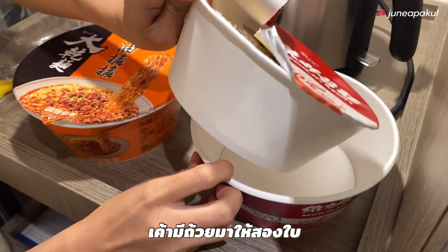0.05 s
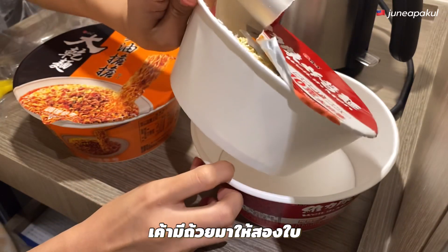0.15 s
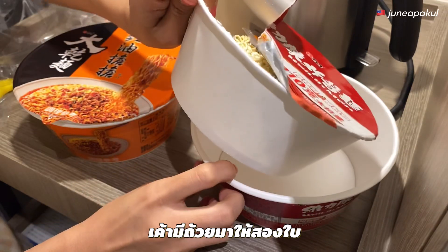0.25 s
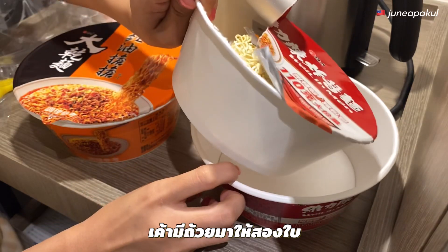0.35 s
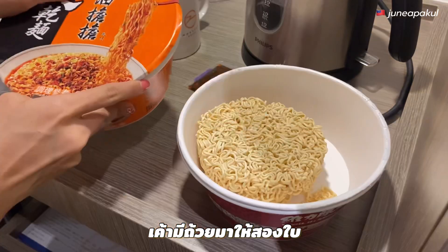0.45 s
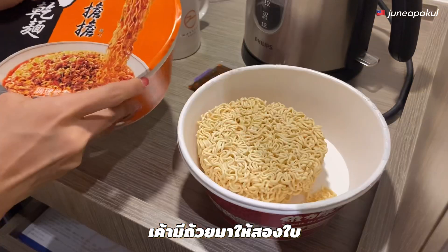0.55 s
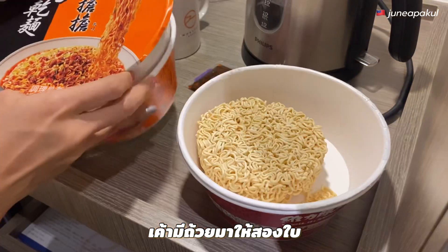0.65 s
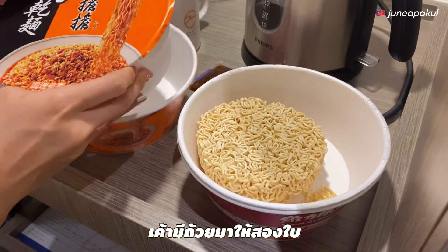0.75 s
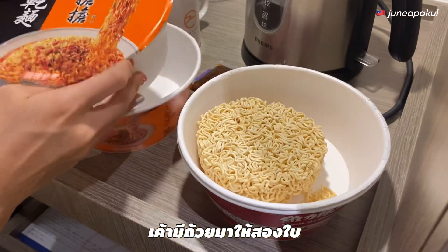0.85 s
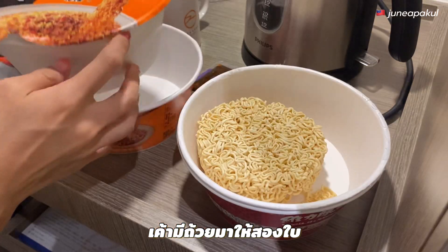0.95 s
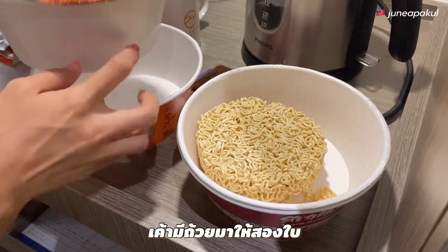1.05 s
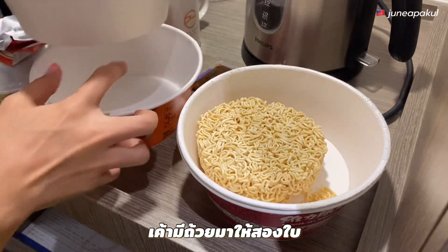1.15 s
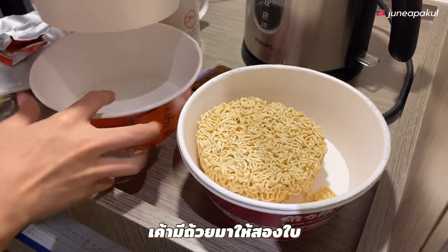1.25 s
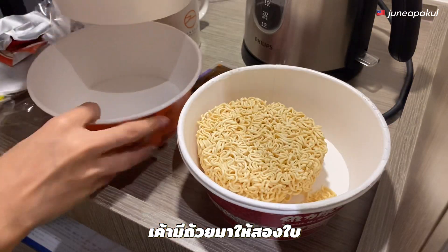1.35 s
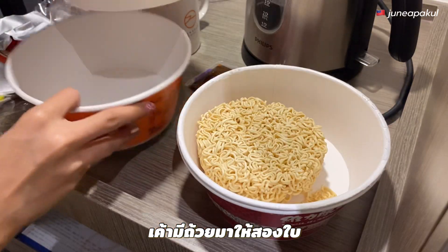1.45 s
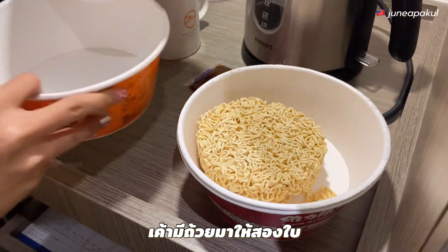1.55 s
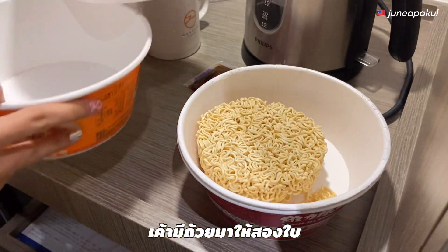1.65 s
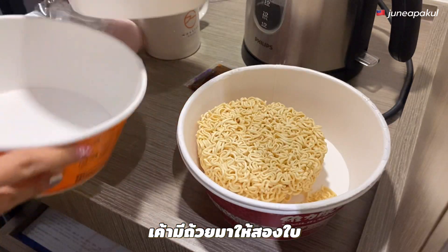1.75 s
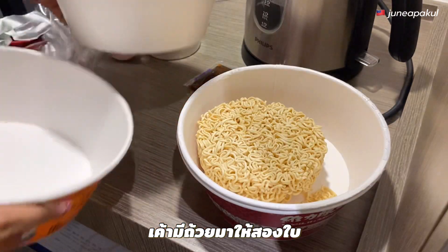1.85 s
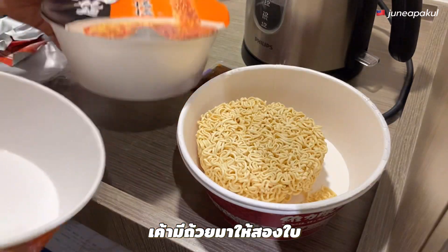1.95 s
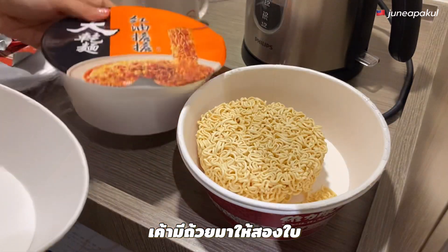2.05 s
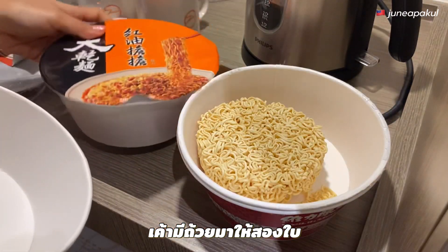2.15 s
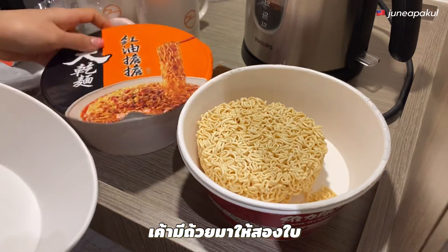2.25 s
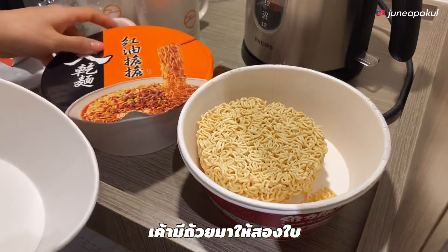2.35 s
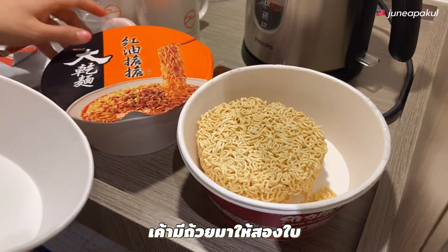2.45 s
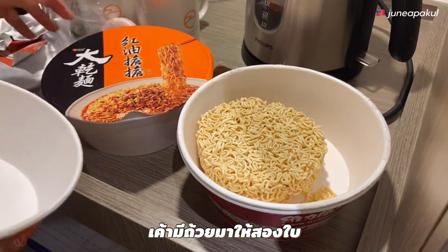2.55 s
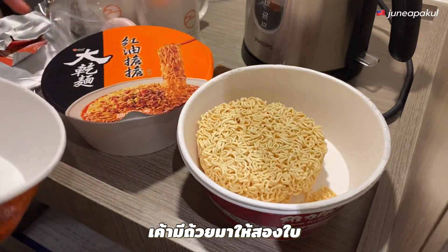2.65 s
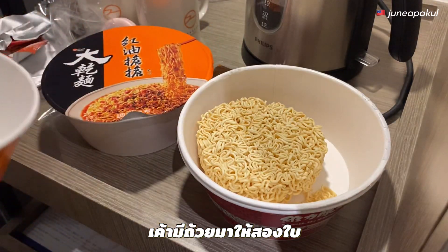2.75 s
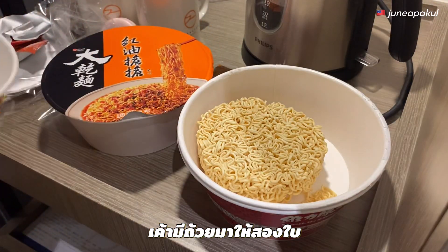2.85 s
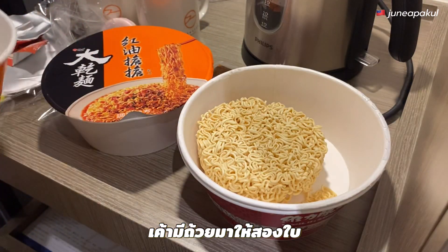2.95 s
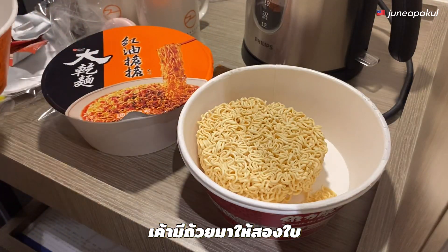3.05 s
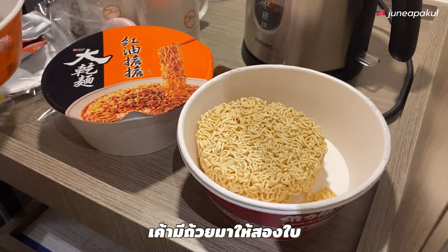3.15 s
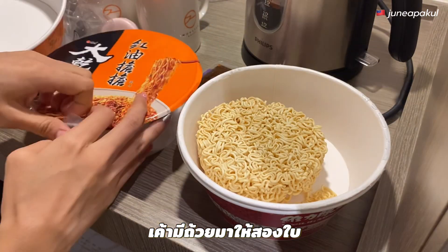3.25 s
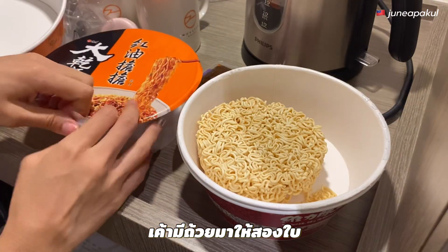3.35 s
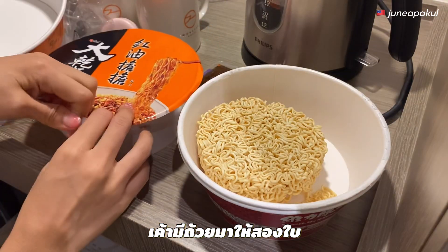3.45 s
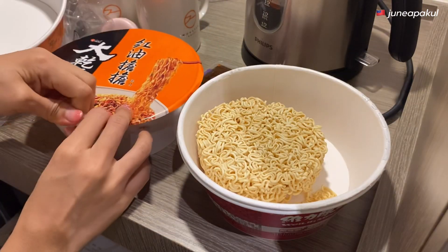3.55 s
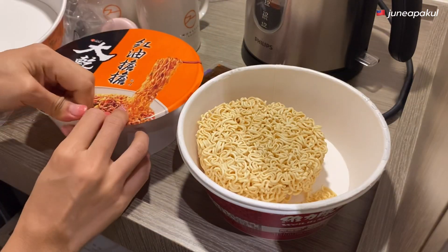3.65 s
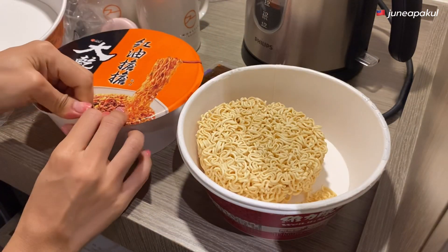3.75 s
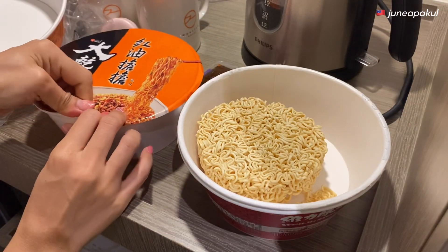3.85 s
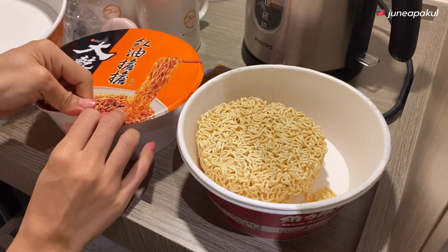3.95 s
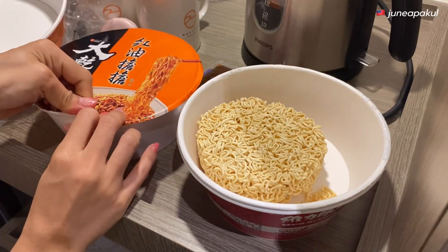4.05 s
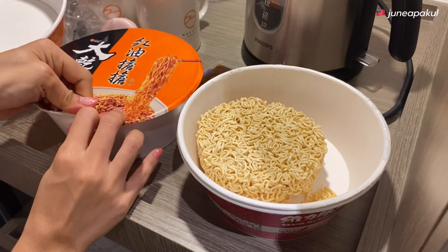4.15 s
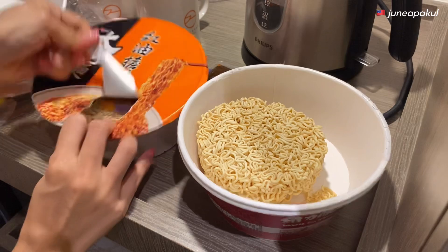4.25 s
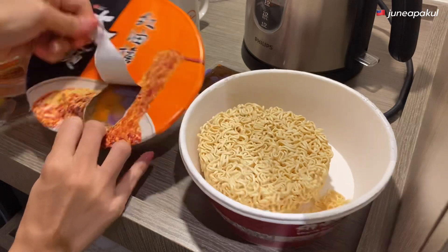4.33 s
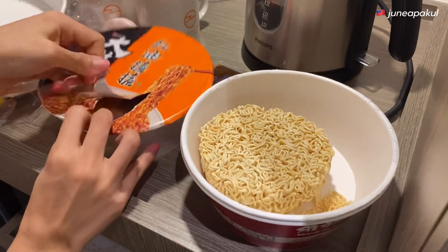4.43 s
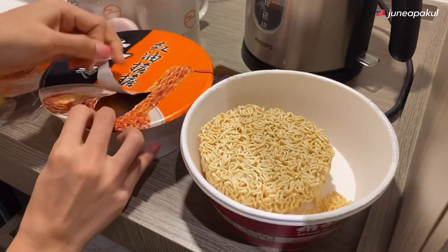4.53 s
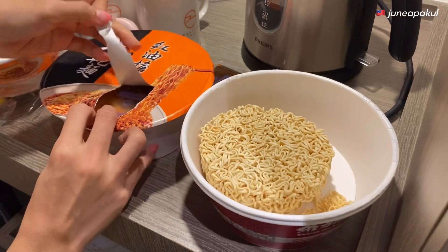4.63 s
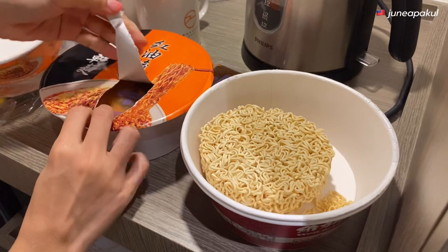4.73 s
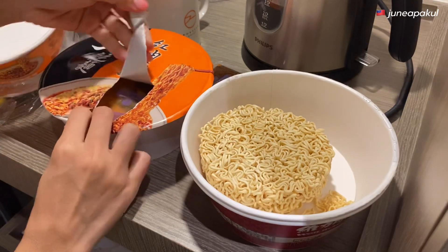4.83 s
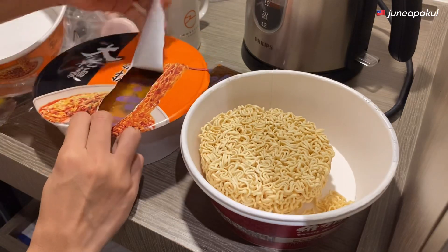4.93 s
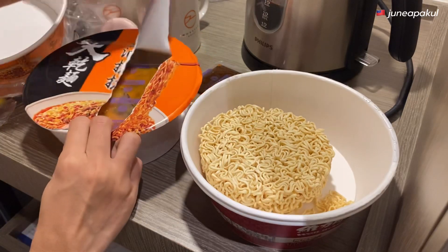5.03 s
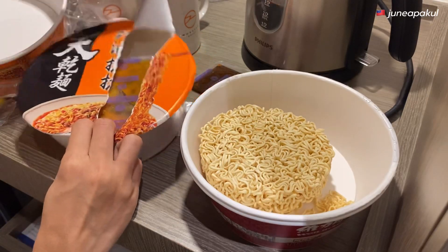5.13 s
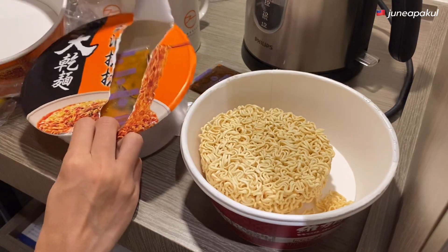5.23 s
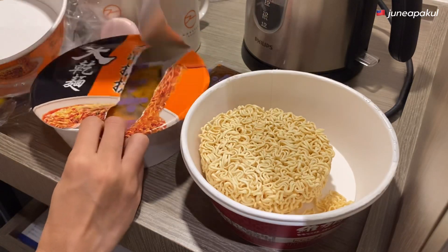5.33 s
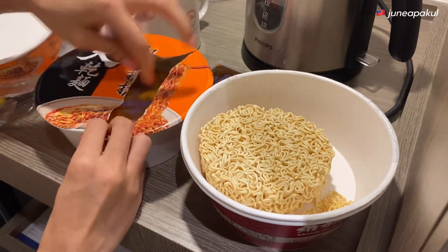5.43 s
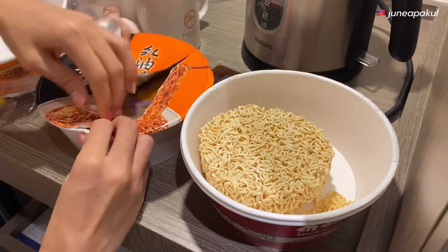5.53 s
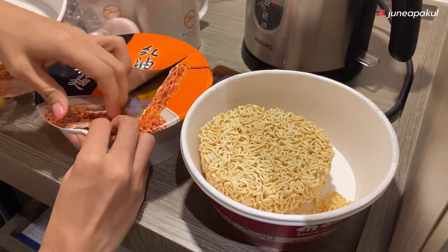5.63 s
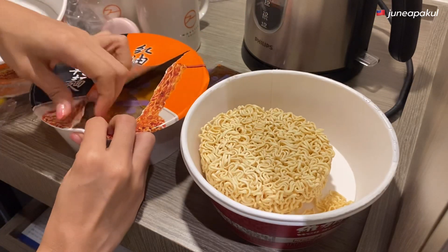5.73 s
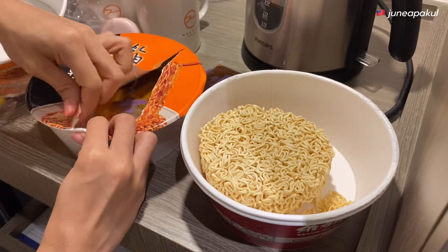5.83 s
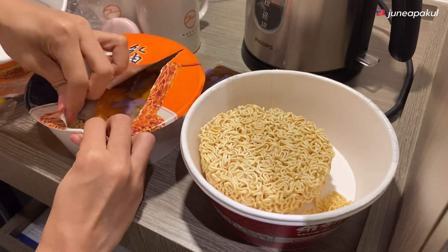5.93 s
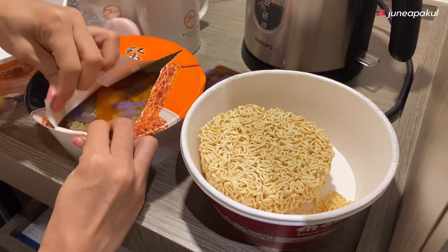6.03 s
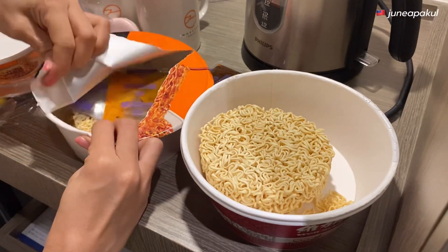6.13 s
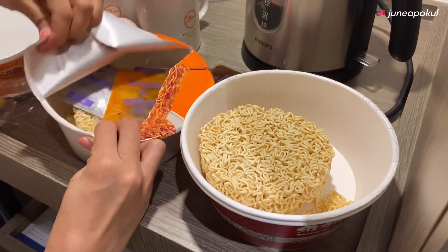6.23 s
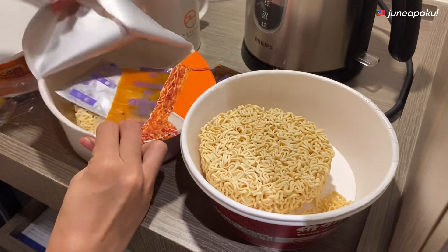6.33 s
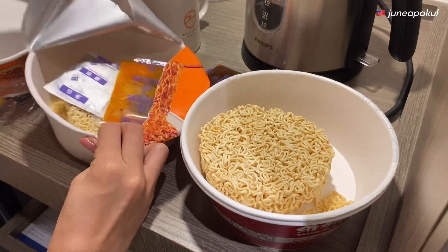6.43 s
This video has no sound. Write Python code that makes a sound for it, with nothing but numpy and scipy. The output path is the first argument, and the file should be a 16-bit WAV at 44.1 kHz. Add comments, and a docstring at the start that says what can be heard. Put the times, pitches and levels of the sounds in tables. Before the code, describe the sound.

Close, dry handling of paper noodle bowls: hollow thumps and scrapes, then fingernails picking and sharp, crackling tears of a foil lid.

```python
"""In a small humming room, hands stack and set down paper bowls on a table, close to a phone with two sound ports.
They also pick at a foil lid and pull it back in jerks.
Blows ring each bowl as a set of fading tones and crack its paper wall as noise and short tones.
Rubbing is a dense rain of tiny grains that shakes the bowl, crinkles the paper and tears the glue.
Paper, foil and nails tick as short noise bursts; the hum is wavering filtered noise."""
import sys
import numpy as np
from scipy import signal
from scipy.fft import rfft, irfft
from scipy.io import wavfile
from scipy.ndimage import uniform_filter1d

SR = 44100
rng = np.random.default_rng(int(sys.argv[2]) if len(sys.argv) > 2 else 0)


def natural_amplitude(level_db):
    """Convert a level in decibels to a linear amplitude factor, elementwise."""
    exponent = np.asarray(level_db, float) / 20
    return 10 ** exponent


def unload_wav(signal):
    """Save mono or channel-first audio to the path in sys.argv[1] as 16-bit WAV at rate SR, clipped to [-1, 1]."""
    wavfile.write(
        sys.argv[1],
        SR,
        np.round(np.clip(np.atleast_2d(signal).T, -1, 1) * 32767).astype(np.int16),
    )


N = 285768  # length of the scene in samples


def shape(table):
    """Gain of every frequency bin, read from (frequency [Hz], gain [dB]) points."""
    hz, db = np.transpose(table)
    bins_hz = np.fft.rfftfreq(N, 1 / SR)
    return natural_amplitude(np.interp(np.log(bins_hz + 1), np.log(hz + 1), db))


def colour(x, table):
    """Filter a sound by such a table."""
    return irfft(rfft(x) * shape(table), N)


def unit(x):
    """Scale to an rms of 1."""
    return x / np.sqrt(np.mean(x ** 2))


def band(x, lo_hz, hi_hz):
    """Keep only the frequencies between two limits."""
    sos = signal.butter(2, [lo_hz, min(hi_hz, .45 * SR)], "bandpass", fs=SR, output="sos")
    return signal.sosfilt(sos, x)


def fade(t60, size):
    """Envelope that loses 60 dB in t60 seconds."""
    return np.exp(-np.log(1000) * np.arange(size) / SR / t60)


def add(out, s, x):
    """Mix x into out from time s."""
    i = int(s * SR)
    out[i:i + len(x)] += x[:N - i]


def walk(rate):
    """Wander in straight lines between random levels, with `rate` new levels a second and rms 1."""
    k = int(SR / rate)
    steps = np.repeat(rng.standard_normal(N // k + 1), k)
    return unit(uniform_filter1d(steps, k)[:N])


def grains(per_s, spread_db):
    """Tiny releases at random moments, most small and a few large."""
    hit, sign, size = rng.random((3, N))
    return unit((hit < per_s / SR) * np.sign(sign - .5) * natural_amplitude(-spread_db * np.log(size + 1e-4)))


# spectrum of the room's hum: (frequency [Hz], level [dB per Hz])
HUM_SPECTRUM = [(21, -84), (36, -7), (90, -15), (128, -3), (161, -11.5), (218, -16.5), (319, -15.5),
                (587, -17), (719, -27.5), (859, -25.5), (1290, -33), (8000, -53), (12000, -52.5),
                (15500, -70)]
HUM_DB = -50.5  # rms of the part that both channels share
# side level against mid level, for hum, near sounds and room: (frequency [Hz], side minus mid [dB])
SIDE_LEVEL = [(60, -12), (330, -11), (600, 1), (1300, 1.5), (3000, -6), (6000, -0.5), (9500, 2),
              (11500, -9.5), (16000, -26)]


def hum():
    """Appliances and air in the room: noise whose bands waver on their own; the two channels share its bass."""
    mid, side = rng.standard_normal((2, N))
    # the low bands and one near 420 Hz flicker faster
    flicker_bands = [(90, 3.5), (125, -5.0), (170, -7), (330, -43), (420, 9.0), (600, -85)]
    flicker = colour(rng.standard_normal(N), flicker_bands) * natural_amplitude(walk(27))
    mid = colour(mid * natural_amplitude(walk(1.66)) + flicker, HUM_SPECTRUM)
    side = colour(colour(side, HUM_SPECTRUM), SIDE_LEVEL)
    return natural_amplitude(HUM_DB) / np.sqrt(np.mean(mid ** 2)) * np.array([mid + side, mid - side])


def room(x):
    """Echoes as a short diffuse tail, duller as it dies; the two channels share its bass and its top."""
    size, t60_s, level_db, dull_hz = 16384, 0.18, -14.5, 6400
    noise = rng.standard_normal((2, size))
    lows = band(noise, 140, dull_hz) * fade(t60_s, size)
    highs = band(noise, dull_hz, 24000) * fade(0.051 * t60_s, size)
    tail = (lows + highs) * np.minimum(np.arange(size) / SR / 0.0055, 1)
    tail = tail / np.sqrt(np.sum(tail ** 2) / 2)
    mid, side = natural_amplitude(level_db) * signal.fftconvolve(x[None], tail, axes=1)[:, :N]
    side = colour(side, SIDE_LEVEL)
    return np.array([mid + side, mid - side])


# lean of near sounds to one port: (frequency [Hz], left minus right [dB])
NEAR_LEAN = [(60, -2), (200, 8), (380, -1.5), (700, 9), (1300, 0.5), (5000, -4), (12000, -1)]


def ports(x):
    """Table, kettle and phone body scatter the near sound differently into the two ports."""
    scatter = rng.standard_normal(2048) * fade(0.011, size=2048)
    scatter = scatter * np.minimum(np.arange(2048) / SR / 0.008, 1)
    scattered = signal.fftconvolve(x, scatter / np.sqrt(np.sum(scatter ** 2)))[:N]
    side = colour(scattered, SIDE_LEVEL)
    lean = np.sqrt(shape(NEAR_LEAN))
    tilt = irfft(rfft(x) * (lean - 1 / lean) / (lean + 1 / lean), N)
    return np.array([x + tilt + side, x - tilt - side])


# a rim scuffs once: (time [s], peak level [dB], starting pitch [Hz], length [s])
SCUFF = [(1.1188, -33, 3450, .013)]


def squeak():
    """A scuffed rim: one short, slightly falling tone with a noisy edge."""
    out = np.zeros(N)
    s, db, hz, length = SCUFF[0]
    t = np.arange(2048) / SR
    tone = np.sin(2 * np.pi * hz * t * (1 - 0.98 * t)) * np.exp(-(t / length) ** 4)
    rasp = unit(band(rng.standard_normal(2048), hz / 1.4, hz * 1.12)) * fade(0.062, size=2048)
    scuff = tone + 0.51 * rasp
    add(out, s, natural_amplitude(db) * scuff / np.abs(scuff).max())
    return out


# short ticks of paper, foil and nails, some on the edge of a blow:
# (time [s], peak level [dB], pitch [Hz])
SHORT_TICKS = [(0.644, -31, 2340), (1.369, -37.5, 2440), (1.694, -39.5, 2670), (2.142, -42, 2060),
               (2.198, -32, 9100), (2.217, -26, 8850), (2.234, -19, 8650), (3.047, -47, 3430),
               (3.354, -37.5, 4300), (3.762, -35, 9500), (3.783, -51, 11500), (3.882, -31, 12000),
               (3.894, -36, 11500), (3.912, -25, 11500), (4.039, -37, 11000), (4.079, -53, 12500),
               (4.1655, -38, 12700), (4.75, -43, 6200), (5.309, -23.5, 3020), (5.656, -38, 2700),
               (5.764, -22, 11000), (5.769, -22, 5150), (5.873, -31.5, 4400)]


def ticks():
    """Short ticks of paper, foil and nails: noise bursts around one pitch, shorter the higher."""
    out = np.zeros(N)
    cycles = 100  # a burst loses 60 dB in this many cycles
    for s, db, hz in SHORT_TICKS:
        burst = band(rng.standard_normal(1024), hz / 1.57, hz * 1.5) * fade(cycles / hz, size=1024)
        add(out, s, burst * natural_amplitude(db) / np.abs(burst).max())
    return out


def move(start, hold, db, change_db, rise_db, fall_db):
    """Power of one hand move: it rises, holds while drifting, and falls; slopes in dB a second."""
    t = np.arange(N) / SR - start
    drift = change_db * np.clip(t / hold, 0, 1)
    slopes = rise_db * np.minimum(t, 0) - fall_db * np.maximum(t - hold, 0)
    return natural_amplitude(db + drift + slopes) ** 2


# hands fidget with the bowls between the moves: (time [s], crinkle level [dB])
FIDGETING = [(0.55, -76), (1.3, -65.5), (2.0, -72.5), (2.5, -71.5), (2.75, -86), (3.15, -75.5), (3.4, -65),
             (4.1, -67), (4.6, -61), (5.6, -64.5), (6.48, -49)]
FIDGET_BOWL_DB, FIDGET_FIZZ_DB = 9, -3  # relative to the crinkle
# paper walls slide on each other: (start [s], hold [s], crinkle level [dB], shaken bowl level [dB])
WALL_SLIDES = [(0.48, 0.021, -54, -49.5), (0.581, 0.092, -49.5, -47), (0.694, 0.01, -41, -25),
               (0.731, 0.041, -44.5, -28), (0.797, 0.096, -51, -32.5), (1.124, 0.0078, -68, -51),
               (1.344, 0.0099, -55, -59), (1.544, 0.027, -42, -42), (2.017, 0.04, -65, -82),
               (2.122, 0.083, -58, -54), (2.222, 0.049, -35, -28.5), (2.416, 0.056, -63, -82),
               (3.047, 0.02, -68, -61), (3.221, 0.049, -51.5, -49.5), (3.333, 0.038, -59.5, -51),
               (3.636, 0.022, -65, -43)]
SLIDE_RISE_DB_PER_S, SLIDE_FALL_DB_PER_S = 906, 181  # of the crinkle
SLIDE_FIZZ_DB = -8  # relative to the crinkle, before pressing dulls it
PRESS_DULLS = 0.29  # dB of fizz lost per dB that the bowl outweighs the crinkle
# pulls on the lid: (start [s], hold [s], crinkle level [dB], change over the hold [dB],
# glue fizz relative to crinkle [dB])
LID_PULLS = [(4.229, 0.038, -28, 1, -2), (4.344, 0.051, -43, 5, -10), (4.427, 0.1, -32.5, -5.5, -6.5),
             (4.865, 0.11, -37, 6.5, -0.5), (5.012, 0.1, -30.5, -5, -1.5), (5.165, 0.092, -40.5, -9, -6),
             (5.31, 0.078, -42.5, 0.5, -1.5), (6.003, 0.19, -43.5, 1, -5), (6.211, 0.22, -42.5, 4, 1)]
PEEL_RISE_DB_PER_S, PEEL_FALL_DB_PER_S = 546, 216  # of the crinkle
PEEL_BOWL_DB = 1.5  # relative to the crinkle
# nails work at the glued edge: (start [s], hold [s], rustle level [dB])
EDGE_PICKS = [(3.729, 0.08, -56), (3.84, 0.089, -51.5), (3.96, 0.026, -58), (4.126, 0.06, -57),
              (4.201, 0.011, -44), (5.467, 0.049, -60), (5.78, 0.012, -64), (5.89, 0.19, -53.5)]
PICK_RISE_DB_PER_S, PICK_FALL_DB_PER_S = 342, 171
BOWL_QUICK, FIZZ_QUICK = 1.37, 1.33  # multiples of the crinkle's rise and fall rates


def hands(t):
    """Gains of bowl, crinkle, fizz and picked foil edge: all moves add in power over the fidgeting."""
    s, db = np.transpose(FIDGETING)
    fidget_db = np.interp(t, s, db, left=-120)
    power = natural_amplitude(fidget_db + np.array([[FIDGET_BOWL_DB], [0], [FIDGET_FIZZ_DB]])) ** 2
    quick = np.array([[BOWL_QUICK], [1], [FIZZ_QUICK]])
    for s, hold, db, bowl_db in WALL_SLIDES:
        fizz_db = db + SLIDE_FIZZ_DB - PRESS_DULLS * (bowl_db - db)
        levels = np.array([[bowl_db], [db], [fizz_db]])
        power = power + move(s, hold, levels, 0, quick * SLIDE_RISE_DB_PER_S, quick * SLIDE_FALL_DB_PER_S)
    for s, hold, db, change_db, fizz_db in LID_PULLS:
        levels = db + np.array([[PEEL_BOWL_DB], [0], [fizz_db]])
        power = power + move(s, hold, levels, change_db,
                             quick * PEEL_RISE_DB_PER_S, quick * PEEL_FALL_DB_PER_S)
    picking = sum(move(s, hold, db, 0, PICK_RISE_DB_PER_S, PICK_FALL_DB_PER_S)
                  for s, hold, db in EDGE_PICKS)
    return np.sqrt(np.vstack([power, picking]))


def patches(lo_hz, count, per_s, pull):
    """Creases of every size: each sixth of an octave has its own grains and flares on its own."""
    flare_per_s, flare_db = 55, 3.
    out = np.zeros(N)
    for hz in lo_hz * 2 ** (np.arange(count) / 6):
        flare = natural_amplitude(pull + flare_db * walk(flare_per_s))
        out += flare * band(grains(per_s, 1.86), hz / 1.06, hz * 1.06)
    return out


# modes of the hollow bowl: (multiple of its pitch [ratio], level [dB], share of its ring time [ratio])
BOWL_MODES = [(0.814, 2.5, 0.36), (0.998, 6, 0.65), (1.141, -5, 0.96), (1.36, -3.5, 0.51),
              (1.699, -10.5, 0.82), (2.1, -7, 0.19), (2.7, -13.5, 0.34), (3.0, -19, 0.54), (3.7, -11, 0.22)]


def bowl(hz, ring_s, sign):
    """Ring of the hollow bowl after one push: fading tones, each weighted by its entry in sign."""
    t = np.arange(8192) / SR
    return sum(p * natural_amplitude(db) * np.sin(2 * np.pi * k * hz * t) * fade(ring_s * share, size=8192)
               for (k, db, share), p in zip(BOWL_MODES, sign))


# centre pitch of the rubbed bowl over time: (time [s], pitch [Hz])
RUBBED_PITCH = [(0.75, 452), (0.82, 500), (2.3, 449), (4.2, 508), (5.0, 484), (5.9, 520), (6.12, 403.5)]
RUB_RING_S = 0.029
RUB_WANDER, RUB_WANDER_PER_S = .09, 30  # rms share by which the grip bends the pitch; new bends a second
RUB_TILT_DB = 0.92  # sharp slips favour the upper modes: gain from one mode to the next


def shaken_bowl(t, pull):
    """Stick-slip grains shake the table and ring the bowl at a wandering pitch."""
    slips = natural_amplitude(1.85 * pull) * grains(1400, 1.16)
    shaken = natural_amplitude(-8.5) * unit(band(slips, 79, 292))  # the table shakes along
    times, pitches = np.transpose(RUBBED_PITCH)
    pitch = np.interp(t, times, pitches) * (1 + RUB_WANDER * walk(RUB_WANDER_PER_S))
    modes = np.arange(len(BOWL_MODES))
    weights = (-1) ** modes * natural_amplitude(RUB_TILT_DB * modes)
    # each slip rings the bowl at the two nearest of these pitches
    ladder = np.geomspace(340, 640, 10)
    for k, hz in enumerate(ladder):
        ring = bowl(hz, RUB_RING_S, weights)
        share = np.sqrt(np.interp(pitch, ladder, np.arange(len(ladder)) == k))
        shaken += signal.fftconvolve(slips * share, ring / np.sqrt(np.sum(ring ** 2)))[:N]
    return shaken


# colour of tearing glue: (frequency [Hz], gain [dB])
GLUE_COLOUR = [(3530, -3.5), (6610, -9.5), (8230, -12), (12400, -6), (13900, -11.5), (15800, -21)]


def glue_fizz(pull):
    """Glue tears in dense bright grains, and single threads of it snap."""
    tearing = patches(3340, count=14, per_s=3200, pull=0.5 * pull) + 0.26 * grains(2500, 1.0)
    threads = colour(grains(160, 1.5), GLUE_COLOUR)
    return unit(colour(tearing, GLUE_COLOUR)) + .4 * unit(threads)


# colour of the picked foil edge: (frequency [Hz], gain [dB])
FOIL_COLOUR = [(5000, -7), (11000, -1), (12200, -1.5), (13000, 5), (13800, -1), (15800, -10.5)]


def picked_edge():
    """Nails rustle the foil edge: bright noise that jumps at random snaps."""
    snaps = uniform_filter1d(np.abs(grains(90, 0.77)), size=60)
    return colour((1 + natural_amplitude(-5) * unit(snaps)) * rng.standard_normal(N), FOIL_COLOUR)


# colour of crinkling paper: (frequency [Hz], gain [dB])
PAPER_COLOUR = [(530, 22.5), (900, 8), (1490, 7), (2570, 7.5), (9000, -9), (11700, -24), (19800, -120)]


def rubbing():
    """Bowl, paper, glue and foil edge under the hands; one flickering pull drives the first three."""
    t = np.arange(N) / SR
    pull = walk(50)
    creases = patches(746.0, count=22, per_s=1700, pull=1.5 * pull) + 0.24 * grains(1100, 2.9)
    crinkle = colour(creases, PAPER_COLOUR)
    layers = (unit(shaken_bowl(t, pull)), unit(crinkle), unit(glue_fizz(pull)), unit(picked_edge()))
    return sum(layer * gain for layer, gain in zip(layers, hands(t)))


# bowls knocked against the table: (time [s], level before the envelope [dB], pitch [Hz])
TABLE_THUDS = [(0.691, -13.5, 195), (1.536, -17.5, 187), (2.236, -17, 160), (3.348, -50, 232),
               (3.889, -24, 252)]


def thuds():
    """A bowl meets the table: a low tone that swells in a few ms and dies quickly."""
    out = np.zeros(N)
    t = np.arange(8192) / SR
    for s, db, hz in TABLE_THUDS:
        swell = np.minimum(t / 0.0058, 1)
        add(out, s, natural_amplitude(db) * np.sin(2 * np.pi * hz * t) * swell * fade(0.04, size=8192))
    return out


# blows and sudden slips: (time [s], peak level of the ring [dB], bowl pitch [Hz],
# bowl ring time [s], gain of the paper crack [dB])
BLOWS = [(0.688, -9.5, 411.4, 0.17, -21.5), (0.7281, -17, 569, 0.077, -18.5),
         (0.747, -18.5, 445, 0.036, -39), (0.77, -45, 443, 0.03, -31), (0.825, -19, 526, 0.14, -23.5),
         (1.5366, -23.5, 399, 0.11, -32.5), (2.198, -19, 745, 0.016, -31.5),
         (2.2171, -12.5, 730, 0.01, -25.5), (2.235, -7.5, 441, 0.03, -22), (2.247, -17, 580, 0.04, -43),
         (2.292, -22.5, 453, 0.017, -44), (3.2267, -25, 482, 0.041, -34.5), (3.346, -22.5, 442, 0.019, -33),
         (3.508, -29, 470, 0.027, -77), (3.638, -31, 624, 0.032, -34.5), (3.887, -16.5, 505, 0.054, -25.5),
         (4.201, -28, 600, 0.054, -32.5), (4.211, 1, 496.4, 0.039, -12.5), (4.309, -17.5, 456, 0.1, -25),
         (4.459, -8, 499, 0.042, -14), (4.519, -17, 494, 0.034, -29), (4.683, -18, 511, 0.043, -40),
         (4.752, -23, 470, 0.016, -44), (4.786, -26.5, 450, 0.033, -54), (4.844, -26, 488, 0.16, -50),
         (4.898, -16.5, 523, 0.031, -31.5), (4.931, -15.5, 498, 0.043, -36), (4.983, -18, 480, 0.05, -21),
         (5.314, -14.5, 424, 0.025, -35.5), (5.525, -23.5, 505.5, 0.063, -44.5),
         (5.763, -23, 504, 0.036, -32.5), (6.185, -24.5, 353, 0.022, -58), (6.222, -25.5, 400, 0.026, -40),
         (6.366, -26.5, 435, 0.064, -36), (6.398, -27, 410, 0.082, -50)]
# stiff wall under a blow: (multiple of the crack pitch [ratio], level [dB], time to lose 60 dB [s])
WALL_MODES = [(0.622, -3, 0.047), (0.949, 2.5, 0.026), (1.22, -2, 0.032), (1.599, -4, 0.032),
              (2.05, -2.5, 0.02)]
WALL_SCATTER = .08  # share by which the wall modes move from blow to blow
LID_WORK_S = 3  # earlier blows land on bare paper, without foil, and are duller
CRACK_HZ, BARE_CRACK_HZ = 1495, 1317  # blows on bare paper crack lower


def knocks():
    """Each blow presses for a few ms, rings the bowl and cracks the stiff paper around one pitch."""
    out = np.zeros(N)
    t = np.arange(8192) / SR
    for s, db, hz, ring_s, crack_db in BLOWS:
        noise = rng.standard_normal((2, 8192))
        bare = s < LID_WORK_S
        crack_hz = BARE_CRACK_HZ if bare else CRACK_HZ
        # each place of contact flips other modes
        ring = bowl(hz, max(ring_s, .01), np.sign(noise[1]))
        # the contact is soft, so the ring swells over a cycle or two
        ring = ring * (1 - np.exp(-t / 0.0031)) ** 2
        crack = natural_amplitude(-1.5) * unit(band(band(noise[0], 450, 4800), 450, 4800))
        crack = crack * np.minimum(t / 0.000083, 1) * fade(0.048, size=8192)
        for (k, wall_db, t60), c in zip(WALL_MODES, noise[1, 100:]):
            mode_hz = k * crack_hz * (1 + WALL_SCATTER * c)
            crack += natural_amplitude(wall_db) * np.sin(2 * np.pi * mode_hz * t) * fade(t60, size=8192)
        crack = band(crack, 250, 6000 * natural_amplitude(0.12 * db))  # gentle blows are duller
        # hard blows have a bright edge that dies quickly
        edge_db = -8.0 + 0.61 * db - (12.0 if bare else 0)
        crack += natural_amplitude(edge_db) * unit(band(noise[0], 3800, 14000)) * fade(0.052, size=8192)
        # a narrow band of noise at the crack pitch rings on
        lasting = unit(band(noise[1], crack_hz / 1.06, crack_hz * 1.06))
        crack += natural_amplitude(-11.0) * lasting * fade(0.15, size=8192)
        add(out, s, ring * natural_amplitude(db) / np.abs(ring).max() + natural_amplitude(crack_db) * crack)
    return out


def scene():
    """Near sounds through the ports and the room, over the hum; blows and rubbing come from different spots."""
    blows = knocks() + thuds() + ticks() + squeak()
    rub = rubbing()
    return ports(blows) + ports(rub) + room(blows + rub) + hum()


def roll_off(x):
    """The treble ends steeply here."""
    return signal.sosfilt(signal.butter(12, 15950, fs=SR, output="sos"), x)


def record(dry):
    """The phone cuts the deep bass and rounds the loudest peaks."""
    bass_cut = signal.butter(3, 42, "highpass", fs=SR, output="sos")
    ceiling = .95
    mix = ceiling * np.tanh(signal.sosfilt(bass_cut, dry) / ceiling)
    return roll_off(mix)


dry = scene()
out = record(dry)
unload_wav(out)
```